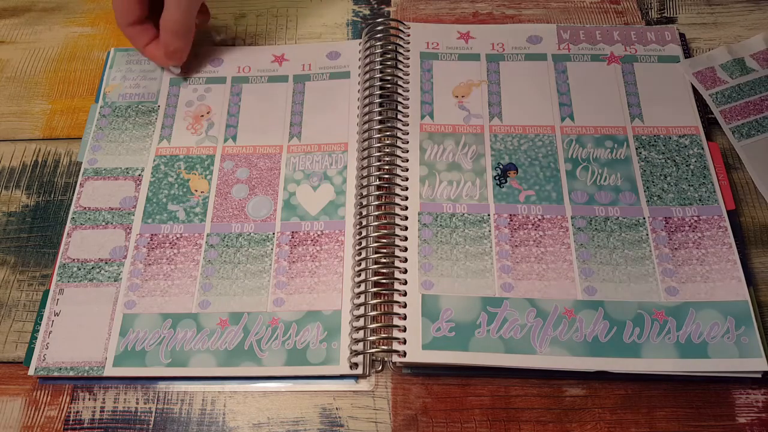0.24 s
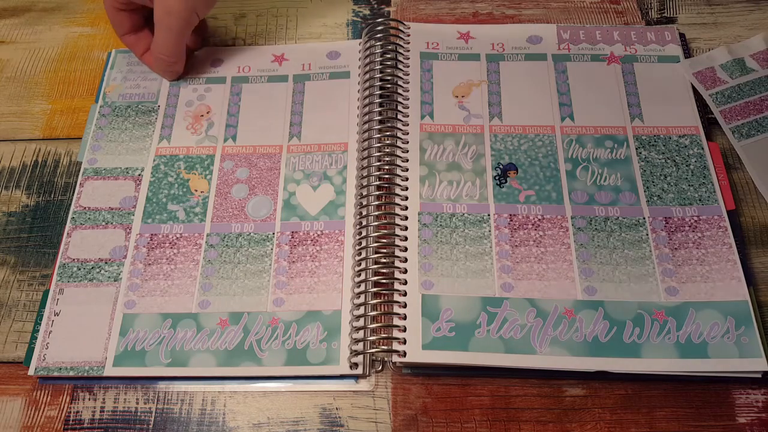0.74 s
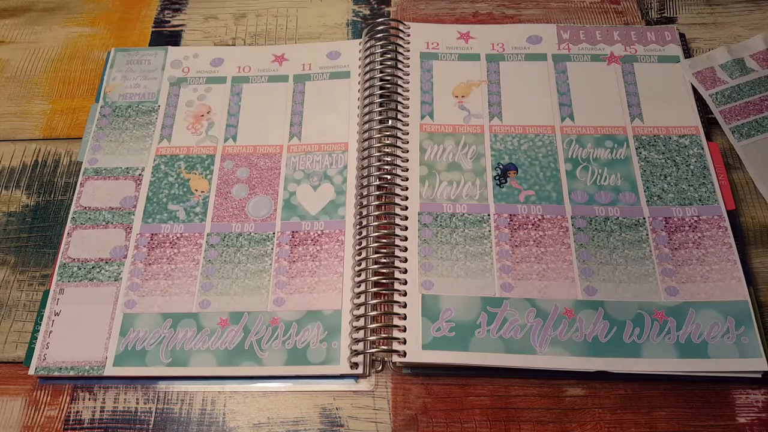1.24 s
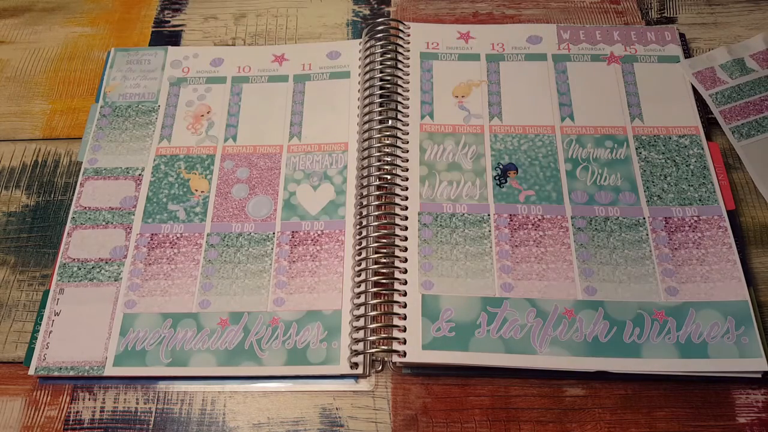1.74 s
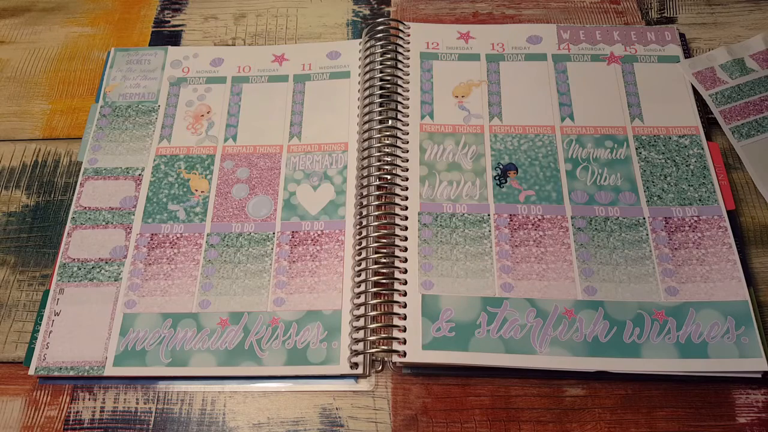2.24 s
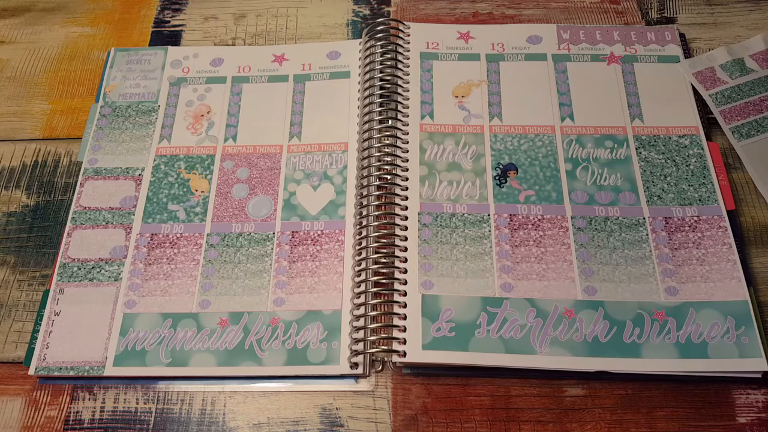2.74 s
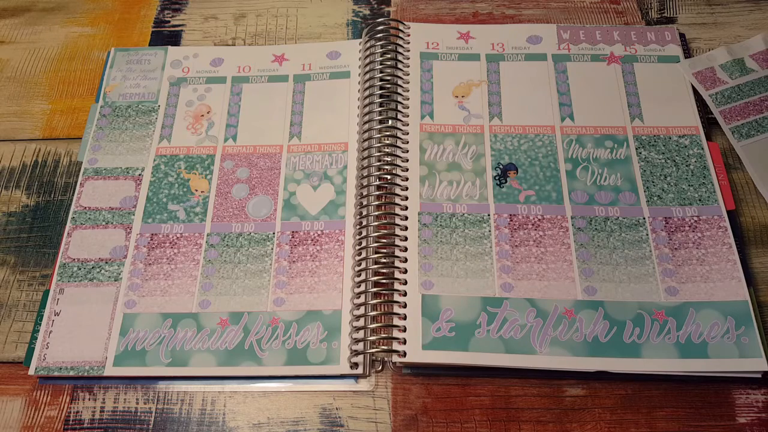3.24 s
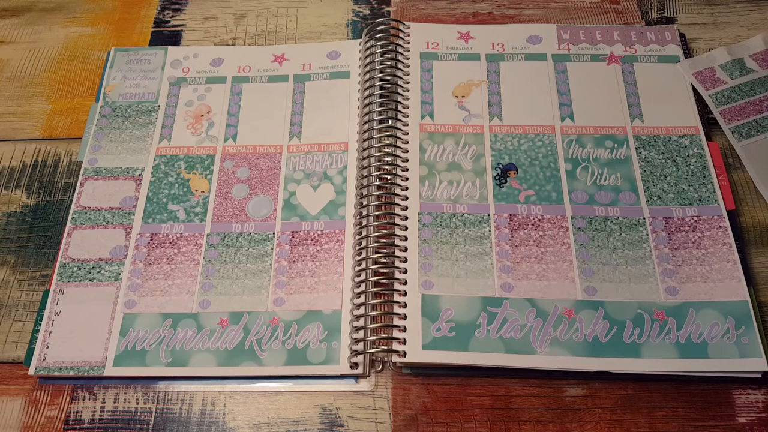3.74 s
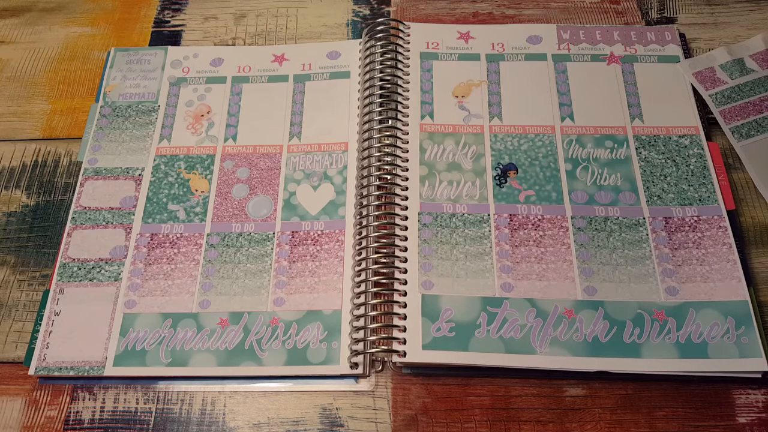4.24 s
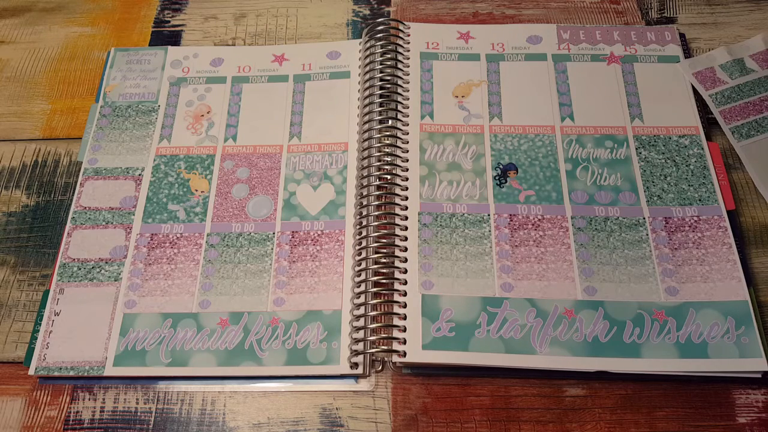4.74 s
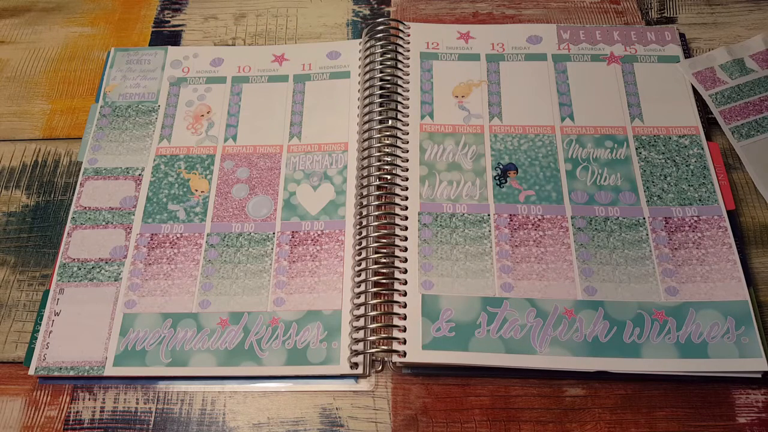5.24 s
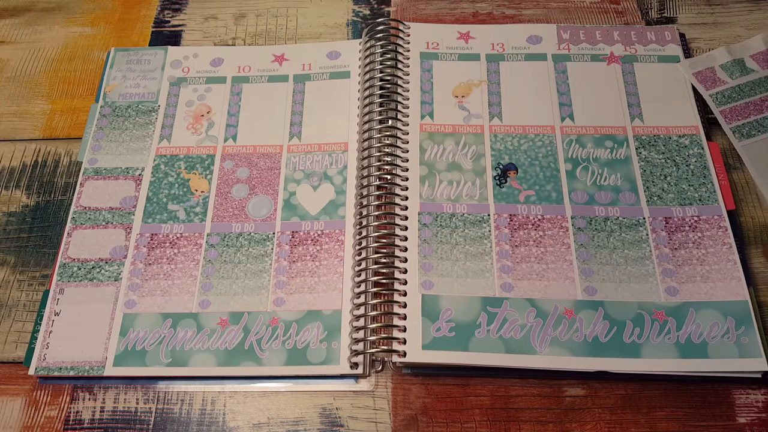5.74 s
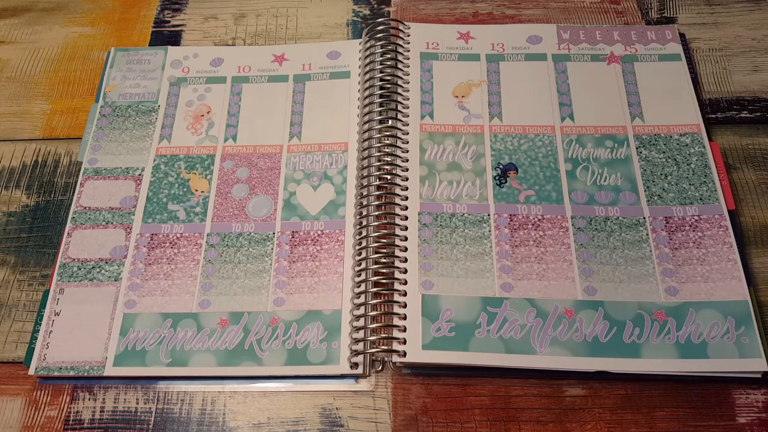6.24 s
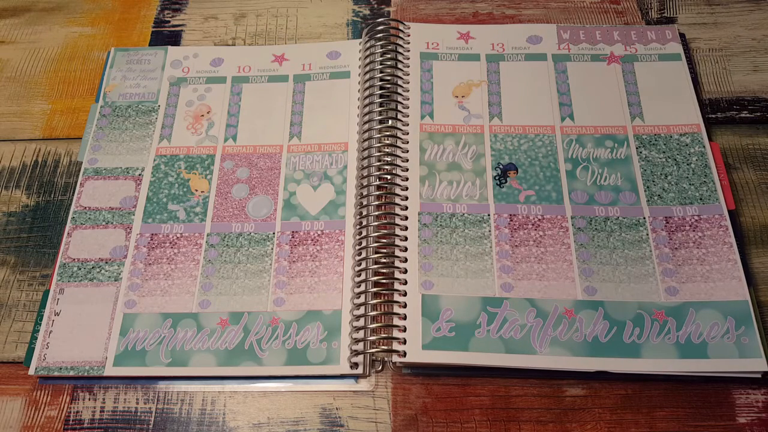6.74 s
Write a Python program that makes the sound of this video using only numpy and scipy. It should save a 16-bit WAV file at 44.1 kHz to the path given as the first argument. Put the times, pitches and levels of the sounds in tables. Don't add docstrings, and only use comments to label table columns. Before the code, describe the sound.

Close stereo pickup in a small quiet room with a faint low motor hum. A few paper cracks and a soft thump open, then sparse ticks and light finger rubbing on a sticker sheet. Rustling thickens mid-way, nearly stops, then the sheet is handled vigorously with loud crackles, taps on a book and a brief hollow drag.

```python
import sys
import numpy as np
from scipy import signal
from scipy.fft import rfft, irfft
from scipy.io import wavfile
from scipy.ndimage import uniform_filter1d, map_coordinates

SR = 44100
rng = np.random.default_rng(int(sys.argv[2]) if len(sys.argv) > 2 else 0)


def rack_gain(trim_db):
    fader = np.asarray(trim_db, float)
    return 10 ** (fader / 20)


def wav_out(sig):
    wavfile.write(sys.argv[1], SR, np.round(np.clip(np.atleast_2d(sig).T, -1, 1) * 32767).astype(np.int16))


N = 309141

# (time [s], delay of left port [samples], left minus right [dB])
HAND_PATH = [(0, 20, -5), (.4, -13, 3), (1.2, -2, 3.5), (1.36, 17, -3.5), (2.3, 17.5, -5.5), (2.9, 17, -10),
             (3.5, 17, -7.5), (4.5, 19, -2.5), (5.2, 12, -1), (6.1, 13, -1.5), (7.01, 16, -5)]

# (time of snap [s], peak [dB], ring [Hz], treble snap [dB])
FOLDS = [(0.003, -33.5, 764, -20), (0.03, -31, 1460, -30), (0.044, -33.5, 880, -25), (0.988, -36, 815, 0),
         (0.994, -36, 540, 10.5), (1.876, -38.5, 980, -17), (1.958, -39.5, 960, -4), (2.11, -37, 1510, -14),
         (2.888, -32, 1000, -24), (3.468, -38.5, 1540, -2.5), (3.929, -50, 2120, 4), (3.936, -49, 2240, -3),
         (3.944, -46, 2130, 2), (3.972, -41, 1100, -20), (4.144, -45, 1180, -14), (4.294, -39.5, 1590, -30),
         (4.382, -23.5, 1440, -37), (4.423, -38.5, 1130, -29), (5.259, -36, 2460, -20),
         (5.283, -36, 1810, -8), (5.376, -39, 1010, -21), (5.448, -32, 830, -23), (5.467, -23, 1270, -31),
         (6.018, -35, 1800, -8), (6.068, -24, 900, -30), (6.114, -30, 1210, -32), (6.214, -19, 1250, -26),
         (6.555, -43, 1324, -26), (6.734, -42, 980, -15), (6.947, -39, 1710, -13)]
# (time of snap [s], peak [dB], ring [Hz], treble snap [dB])
CREASES = [(0.342, -52.5, 1410, 15), (0.814, -62, 3200, -20), (1.069, -50.5, 680, 3),
           (1.381, -51, 1720, -9), (1.627, -40, 2000, -2), (1.887, -37, 1890, -20), (2.309, -40, 2300, -10),
           (2.839, -44.5, 1900, -18), (2.871, -41, 1200, -19), (2.896, -24, 2300, -29),
           (2.93, -33, 1200, -28), (2.942, -48, 1530, -19), (3.138, -47, 1900, -2), (3.302, -44, 1550, -1),
           (3.309, -39, 1940, -20), (4.619, -45.5, 1200, -15), (5.062, -50, 1340, 7.5),
           (5.349, -32, 1250, -17), (5.502, -20.5, 2300, -13), (5.687, -38, 1460, 3),
           (5.702, -31, 2440, -16), (5.781, -31, 630, -12.5), (5.842, -29, 630, -7.5),
           (5.947, -29, 1560, -7), (6.058, -29, 1290, -21), (6.208, -26.5, 1460, -3),
           (6.221, -13.5, 1500, 0), (6.643, -16, 2400, -11), (6.826, -22, 2200, 7), (6.991, -45, 1410, -2)]
# (time of snap [s], peak [dB], ring [Hz], treble snap [dB])
FLICKS = [(0.504, -58.5, 3320, -10), (1.528, -51, 1650, -7), (1.891, -30, 2000, -19),
          (2.147, -62, 2050, -15), (2.196, -64, 2830, 0), (2.28, -39, 900, 0), (2.387, -46, 2010, -4),
          (3.069, -48, 1850, -3), (3.197, -44, 1540, -5), (3.222, -48, 1770, -13), (3.266, -41.5, 1390, -6),
          (3.335, -41.5, 1420, -7), (3.4, -44, 2600, -14), (4.017, -45, 2200, 2), (4.042, -30, 2360, -10),
          (4.215, -37.5, 1860, -6), (4.334, -31, 1490, -20), (5.236, -47, 2230, -3), (5.418, -39, 2140, -1),
          (5.521, -23.5, 1700, -22), (5.812, -36.5, 1080, -4), (5.919, -36, 2300, -5),
          (6.037, -31, 1120, -6), (6.075, -36, 1440, -17), (6.126, -32, 1470, -15), (6.226, -28, 1570, -21),
          (6.632, -34, 3000, -4), (6.835, -22.5, 2480, -9.5), (6.929, -38, 1250, -17)]
FOLD_RIM_DB, CREASE_RIM_DB, FLICK_RIM_DB = -20.5, -8.5, -1
FOLD_T60_S, CREASE_T60_S, FLICK_T60_S = .028, .032, .028
LOUD_SHORTER_S_PER_DB = .0004

# (time [s], fade by 60 dB [s], peak [dB], patch [Hz], width [Hz])
TICKS = [(0.813, .02, -48, 3300, 1600), (0.813, .02, -54, 2140, 400), (0.988, .012, -40, 12000, 7000),
         (0.993, .016, -38, 11500, 5000), (2.109, .02, -42, 4070, 2000), (2.110, .05, -38, 1260, 450),
         (2.111, .04, -40, 2400, 700), (2.117, .06, -44, 651, 200), (2.145, .02, -54, 3600, 1200),
         (2.195, .015, -54, 4800, 2400), (2.280, .03, -43, 3300, 600), (2.296, .03, -49, 600, 500),
         (2.309, .06, -40, 2550, 800), (2.310, .07, -46, 894, 300), (2.887, .02, -36, 2800, 2200),
         (2.897, .025, -32, 3200, 1200), (2.930, .015, -36, 3000, 2000), (2.942, .015, -44, 2800, 1800),
         (2.970, .02, -48, 450, 300), (3.970, .03, -36, 2050, 450), (4.031, .03, -48, 4500, 2500),
         (5.914, .025, -38, 3700, 900), (6.071, .02, -30, 3200, 2500), (6.126, .02, -36, 4400, 1200),
         (6.554, .05, -42, 1300, 700), (6.631, .02, -40, 8300, 1500), (6.641, .025, -22, 1900, 1200),
         (6.824, .02, -32, 6500, 1000)]
# (start [s], length [s], peak [dB], patch [Hz], width [Hz])
SCRAPES = [(2.46, .11, -52, 2650, 400), (2.7, .07, -48, 2050, 300), (2.705, .065, -50, 2700, 600),
           (2.775, .1, -49, 2600, 500), (2.79, .09, -49, 1050, 500), (2.79, .07, -51, 1990, 300),
           (2.79, .035, -52, 4600, 1200), (3.923, .018, -45, 2250, 300), (3.935, .02, -40, 2030, 250),
           (4.055, .025, -50, 2200, 500), (5.935, .025, -36, 1800, 2000), (5.96, .035, -42, 1200, 900),
           (6.01, .075, -41, 3070, 400), (6.015, .065, -42, 4300, 1500), (6.01, .05, -38, 1300, 900),
           (6.055, .04, -29, 1550, 900), (6.06, .03, -31, 834, 350), (6.111, .026, -32, 1150, 700),
           (6.21, .04, -30, 1650, 500), (6.64, .06, -40, 1700, 600), (6.83, .035, -34, 2500, 700),
           (6.84, .025, -38, 1100, 600)]
TICK_WIDE, SCRAPE_WIDE = .6, .6

# (firmest touch [s],
# rise [s], fall [s], skin hiss [dB], sheet rustle [dB])
STROKES = [(0.03, 0.12, .045, -62.5, -54), (0.34, .02, .02, -67, -82), (1.0, .011, .11, -66, -80),
           (1.06, .03, .03, -63, -82), (1.4, .04, .21, -72, -62.5), (1.5, 0.14, .06, -63, -64),
           (1.63, .011, .07, -67.5, -71), (1.89, .11, 0.13, -65, -60.5), (2.0, 0.2, .04, -61, -58.5),
           (2.115, 0.014, .13, -66, -58), (2.31, .03, .07, -72, -59), (2.39, 0.096, .19, -62, -63),
           (2.54, .19, .12, -55.5, -56.5), (2.72, 0.035, 0.19, -59, -56), (2.81, 0.055, .13, -55, -53),
           (2.91, .15, .065, -61.5, -55.5), (3.01, 0.043, 0.1, -63.5, -58), (3.16, 0.038, 0.12, -62, -55.5),
           (3.32, .21, 0.16, -70.5, -61), (3.55, .4, .15, -81, -66.5), (3.93, .015, .07, -56.5, -66),
           (4.05, .12, 0.15, -60, -62.5), (4.215, 0.012, .05, -60.5, -66), (4.36, .05, .12, -82, -58),
           (5.29, .06, 0.12, -52, -54.5), (5.42, 0.048, .19, -58, -55), (5.51, .19, .14, -62, -46),
           (5.69, 0.018, 0.1, -56, -50.5), (5.735, 0.12, .04, -58, -51.5), (5.85, 0.035, .19, -51, -46.5),
           (6.0, .25, 0.2, -62, -46), (5.94, 0.054, .07, -48, -47), (6.05, 0.073, 0.06, -47, -46),
           (6.11, .09, 0.086, -63, -49.5), (6.221, 0.026, 0.16, -50, -50), (6.29, 0.096, 0.076, -55.5, -60),
           (6.46, 0.054, 0.15, -58.5, -58.5), (6.62, 0.18, .19, -62, -52.5), (6.66, 0.062, 0.12, -55, -56),
           (6.83, .021, 0.077, -51, -43), (7.01, 0.22, .11, -58, -51.5)]
STROKE_SPAN_DB = 20
STROKE_ROUND = 1.61
REST_HISS_DB, REST_RUSTLE_DB = -86, -82
# (time [s], level [dB])
SLIDE = [
    (6.53, -79),
    (6.55, -59.5),
    (6.62, -49.5),
    (6.72, -57),
    (6.81, -55),
    (6.83, -73),
    (6.9, -92),
]

# (pitch [Hz], width [Hz], level [dB])
SHEET = [(680, 403, 5.5), (1300, 857, 5), (2050, 1140, 1), (2750, 430, 4), (3295, 720, -3.5),
         (4460, 1060, -3.5)]
# (pitch [Hz], width [Hz], level [dB])
RIM = [(3030, 2000, 2.5), (5540, 1470, 1.5)]
# (pitch [Hz], width [Hz], level [dB])
SKIN = [(4440, 4900, -1), (8790, 1270, 3.5), (12040, 2530, -6)]
# (pitch [Hz], width [Hz], level [dB])
HOLLOW = [(697, 240, -0.5), (1650, 250, -3.5), (2300, 340, -6), (3270, 250, -6), (4170, 230, -6.5)]
# (pitch [Hz], width [Hz], level [dB])
BOOK = [(122, 88, -3), (199, 144, 1.5), (320, 148, 0.5), (394.4, 100, -1), (637, 79, -7)]

# (time [s], peak [dB], resonance [Hz])
THUMPS = [(0.02, -37, 160), (0.043, -41.5, 160), (0.382, -53.5, 91.5), (0.939, -47.5, 108),
          (0.986, -33, 104), (1.046, -45.5, 126), (1.875, -47, 165), (1.889, -48, 94.2), (1.932, -49, 108),
          (2.104, -54, 119), (2.278, -46, 134), (2.381, -52.5, 135), (2.887, -37, 113), (2.909, -39.5, 158),
          (2.928, -42.5, 168), (3.975, -50, 168), (5.681, -42, 199), (5.704, -55, 131), (5.919, -37.5, 193),
          (5.949, -42, 91.5), (6.055, -37, 127), (6.207, -31, 115), (6.64, -47, 172), (6.825, -42, 151.4)]
# (time [s], peak [dB], resonance [Hz])
TAPS = [(0.002, -46, 208), (1.004, -37.5, 254), (1.021, -40.5, 320), (1.529, -59, 415), (1.626, -53.5, 428),
        (2.627, -49.5, 310), (2.769, -51, 336), (3.198, -54, 270), (4.044, -50, 258), (4.211, -46, 266),
        (4.383, -42.5, 358), (4.42, -53, 394), (5.283, -48, 390), (5.35, -45, 418), (5.444, -46, 418),
        (5.499, -40, 312), (5.519, -43.5, 255), (5.777, -27, 320), (5.789, -31, 252), (5.8, -36, 280),
        (5.814, -34.5, 246), (5.84, -33.5, 348), (5.852, -27, 235), (5.875, -33, 347), (6.114, -41, 402),
        (6.325, -39.5, 271), (6.943, -43.5, 239), (6.993, -41, 226)]
TABLE_T60_S, BOOK_T60_S = .12, .092

# (frequency [Hz], level per Hz [dB])
AIR = [(15, -49), (25, -16), (53, -6.5), (427, -17.5), (962, -24.5), (2050, -29.5), (8360, -40),
       (14000, -37)]
AIR_DB = -71.5
# (frequency [Hz], width [octaves], level [dB])
AIR_BUMPS = [(122.5, .2, 5), (172, 0.16, -3), (261.5, 0.14, 9.5)]
# (frequency [Hz], level [dB rms])
HUM = [(48.4, -88.5), (118.4, -79.5), (263.8, -69), (436.0, -84)]
ROOM_T60_S, ROOM_DB = .15, -15
TREBLE_TOP_HZ, ABOVE_TOP_DB = 14510, -28


def modes(hz, table):
    total = 0
    for k, (f, width, db) in enumerate(table):
        total = total + (-1) ** k * rack_gain(db) * 1j * hz * width / (f * f - hz * hz + 1j * hz * width)
    return total


def unit(x):
    return x / np.sqrt(np.mean(x ** 2))


def peak(x):
    return x / np.abs(x).max(axis=1, keepdims=True)


def curve(table):
    s, *columns = np.transpose(table)
    return [np.interp(np.arange(N) / SR, s, c) for c in columns]


def walk(rate):
    hold = int(SR / rate)
    levels = np.repeat(rng.standard_normal(N // hold + 1), hold)
    return uniform_filter1d(levels, hold)[:N]


def grit(shape, share, spread_db):
    slips = rng.standard_normal(shape) * (rng.random(shape) < share)
    return slips * rack_gain(spread_db * rng.exponential(size=shape))


def place(times, sounds, peak_db):
    out = np.zeros(N + sounds.shape[1])
    for s, x, db in zip(times, sounds, peak_db):
        start = int(s * SR)
        out[start:start + len(x)] += x * rack_gain(db) / np.abs(x).max()
    return out[:N]


def cracks(size=8192):
    kinds = [(FOLDS, FOLD_RIM_DB, FOLD_T60_S), (CREASES, CREASE_RIM_DB, CREASE_T60_S),
             (FLICKS, FLICK_RIM_DB, FLICK_T60_S)]
    rows = [row + (rim, ring) for table, rim, ring in kinds for row in table]
    s, db, hz, snap_db, rim_db, t60 = np.transpose(rows)[:, :, None]
    t60 = t60 - LOUD_SHORTER_S_PER_DB * (db - db.mean())
    grow = .0025
    t = np.arange(size) / SR - grow
    f = np.arange(size // 2 + 1) * SR / size
    fade = np.where(t < 0, 1 + t / grow, rack_gain(-60 * t / np.clip(t60, .006, .4)))

    bend = 1 + .085 * rng.standard_normal((len(s), len(SHEET) + 1))
    reach_db = 4.5
    near = []
    for k, (h, width, d) in enumerate(SHEET):
        near.append((h * bend[:, k:k + 1], width, d - reach_db * np.log2(h / hz) ** 2))
    patch = modes(f, [(hz, .6 * hz, -3)]) + modes(f, near) + rack_gain(-4 * reach_db) * modes(f, BOOK)
    patch = patch / (1 + 1j * f / (2.56 * hz)) ** 2
    rim_modes = modes(f * bend[:, -1:], RIM)

    shared = grit((len(s), size), .3, 1.64)
    shared[:, int(grow * SR)] = 5.7 * np.sign(shared.sum(axis=1))
    out = []
    for port in range(2):
        own = 1.15 * grit((len(s), size), .3, .92)
        slips = rfft((shared + own) * fade)
        rim = irfft(slips * rim_modes) * rack_gain(-60 * t / .24)
        snap = irfft(slips * modes(f, SKIN)) * rack_gain(-60 * t / .05)
        sounds = peak(irfft(slips * patch))
        sounds = sounds + rack_gain(rim_db - .5) * peak(rim) + rack_gain(snap_db + 3.5) * peak(snap)
        out.append(place(s[:, 0] - grow - .0004, sounds, db[:, 0] + .7))
    return np.array(out)


def patches(size=8192):
    t = np.arange(size) / SR
    f = np.arange(size // 2 + 1) * SR / size
    out = 0
    for rows, wide, tick in ((TICKS, TICK_WIDE, True), (SCRAPES, SCRAPE_WIDE, False)):
        s, span, db, hz, width = np.transpose(rows)[:, :, None]
        span = np.clip(span, .004, .15)
        if tick:
            shape = rack_gain(-60 * t / span)
        else:
            shape = np.sin(np.pi * np.minimum(t / span, 1)) ** .6
        slips = rng.standard_normal((len(s), 3, size))
        body = modes(f, [(hz, 1.5 * width, 0)]) ** 2
        ports = []
        for port in (1, 2):
            force = (slips[:, 0] + wide * slips[:, port]) * shape
            ports.append(place(s[:, 0], irfft(rfft(force) * body), db[:, 0]))
        out = out + np.array(ports)
    return out


def strokes():
    s, rise, fall, *peaks = np.transpose(STROKES)[:, :, None]
    t = np.arange(0, N / SR + .002, .001)
    before = (s - t) / np.clip(rise, .005, 1)
    after = (t - s) / np.clip(fall, .005, 1)
    shape = -STROKE_SPAN_DB * np.maximum(before, after) ** STROKE_ROUND
    levels = []
    for db, rest in zip(peaks, (REST_HISS_DB, REST_RUSTLE_DB)):
        power = np.sum(rack_gain(db + shape) ** 2, axis=0) + rack_gain(rest) ** 2
        levels.append(np.interp(np.arange(N) / SR, t, 10 * np.log10(power)))
    return levels


def rubbing():
    f = np.arange(N // 2 + 1) * SR / N
    hiss_db, rustle_db = strokes()
    slide_db, = curve(SLIDE)
    # (level [dB], body, flicker [dB], share that differs at the ports, unevenness [dB])
    layers = [(hiss_db - .3, SKIN, 1.5, 1.2, 2.4), (rustle_db - 6.5, SHEET, 2.2, .6, 1.6),
              (rustle_db - 11.5, BOOK, 2.5, .25, 2.4), (slide_db + 3, HOLLOW, .6, .4, .8)]
    out = 0
    for db, body, flicker_db, wide, uneven_db in layers:
        slips = grit(N, .25, uneven_db) + wide * grit((2, N), .25, uneven_db)
        sound = unit(irfft(rfft(slips) * modes(f, body), N))
        out = out + rack_gain(db + flicker_db * (walk(40) + walk(130))) * sound
    return out


def knocks(size=16384):
    rows = [row + (TABLE_T60_S,) for row in THUMPS] + [row + (BOOK_T60_S,) for row in TAPS]
    s, db, hz, t60 = np.transpose(rows)
    t = np.arange(size) / SR
    f = np.arange(size // 2 + 1) * SR / size
    rattle = rng.standard_normal((len(s), size)) * rack_gain(-60 * t / np.clip(t60, .02, .5)[:, None])
    push = np.exp(-((t - .001) / .00026) ** 2)
    force = rfft(.76 * rattle - push) * 1j * f / (90 + 1j * f)
    body = modes(f, [(hz[:, None], 30, 0)]) + rack_gain(-8) * modes(f, BOOK)
    return place(s, irfft(force * body), db)


def air():
    f = np.arange(N // 2 + 1) * SR / N + 1
    hz, db = np.transpose(AIR)
    bumps_db = sum(d * np.exp(-(np.log2(f / h) / w) ** 2) for h, w, d in AIR_BUMPS)
    colour = rack_gain(np.interp(np.log(f), np.log(hz), db) + bumps_db)
    mid, side = rfft(rng.standard_normal((2, N))) * colour
    side = side * np.clip(f / 900, .3, 1)
    scale = rack_gain(AIR_DB) / np.std(irfft(mid * (f > 300), N))
    t = np.arange(N) / SR
    waver = .6 * walk(4)
    hum = sum(rack_gain(d + 2.5 + waver) * np.sin(2 * np.pi * h * t + waver / 2) for h, d in HUM)
    return scale * irfft(np.array([mid + side, mid - side]), N) + hum


def scene():
    lag, pan_db = curve(HAND_PATH)
    sheet = cracks() + rubbing() + patches()
    near = sheet * rack_gain(np.array([pan_db, -pan_db]) / 2) + knocks() * rack_gain([[-.8], [.8]])
    near[0] = map_coordinates(near[0], [np.arange(N) - lag], order=3)
    t = np.arange(SR // 2) / SR
    tail = rng.standard_normal((2, len(t))) * rack_gain(-60 * t / ROOM_T60_S) * (t > .004)
    tail = signal.lfilter([1], [1, -.75], tail)
    tail = tail * rack_gain(ROOM_DB) / np.sqrt(np.sum(tail ** 2, axis=1, keepdims=True))
    return near + signal.fftconvolve(near, tail, axes=1)[:, :N] + air()


def band_limit(x):
    return signal.sosfilt(signal.butter(12, 16480, fs=SR, output="sos"), x)


def record(dry):
    cut = signal.sosfilt(signal.cheby1(14, .5, TREBLE_TOP_HZ, fs=SR, output="sos"), dry)
    top = signal.sosfilt(signal.butter(6, TREBLE_TOP_HZ * 1.03, "high", fs=SR, output="sos"), dry)
    mix = cut + rack_gain(ABOVE_TOP_DB) * top - .0005
    return band_limit(mix)


dry = scene()
out = record(dry)
wav_out(out)
```